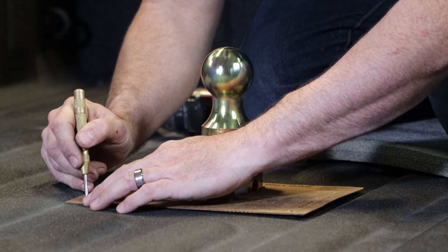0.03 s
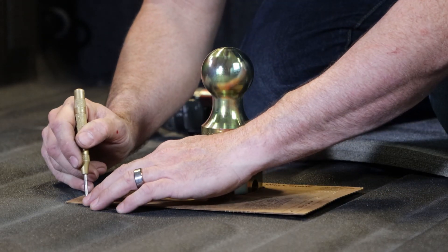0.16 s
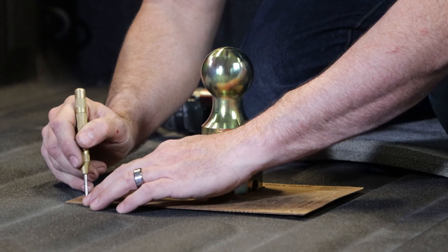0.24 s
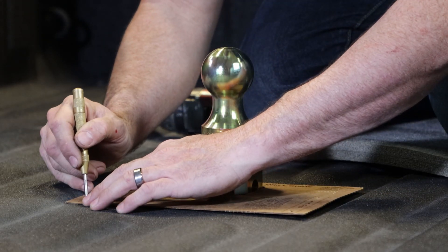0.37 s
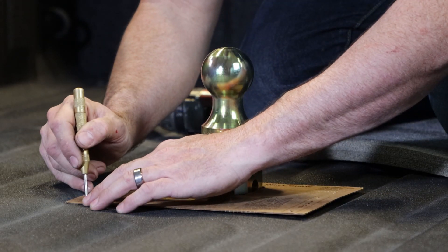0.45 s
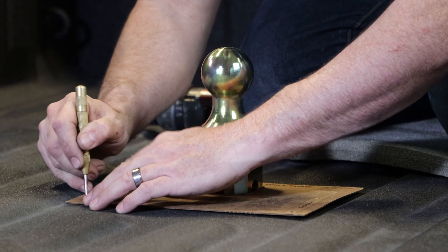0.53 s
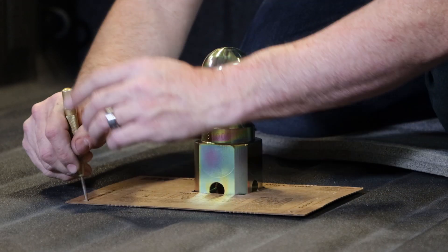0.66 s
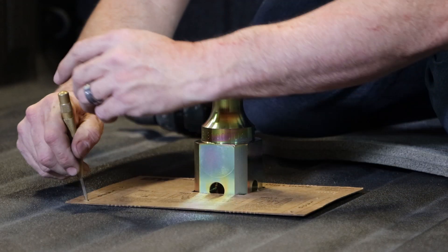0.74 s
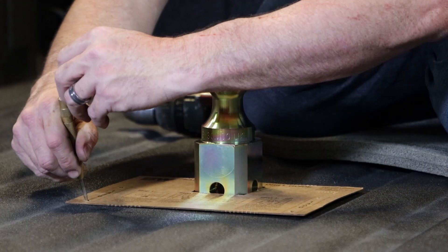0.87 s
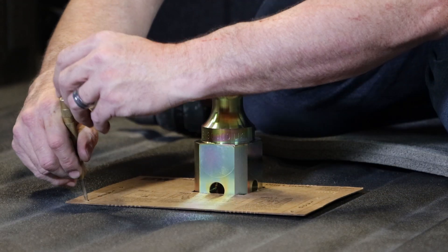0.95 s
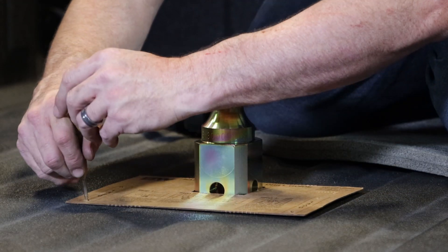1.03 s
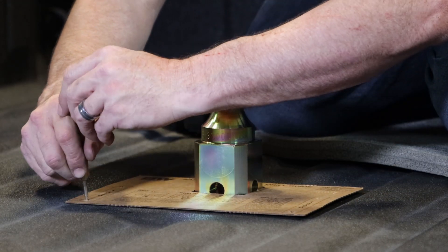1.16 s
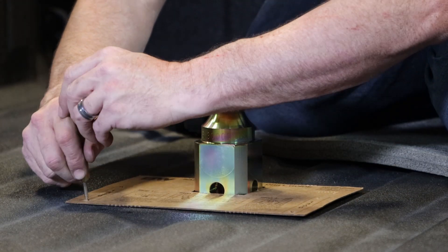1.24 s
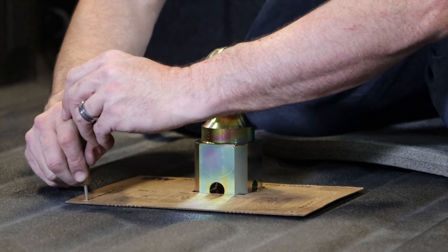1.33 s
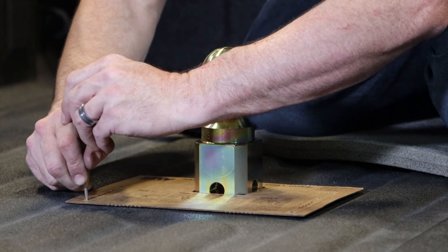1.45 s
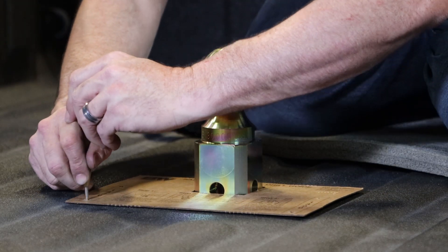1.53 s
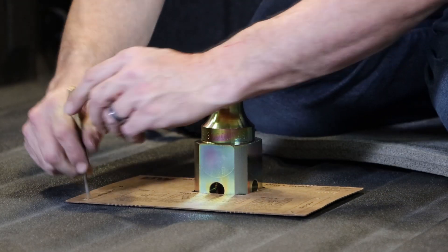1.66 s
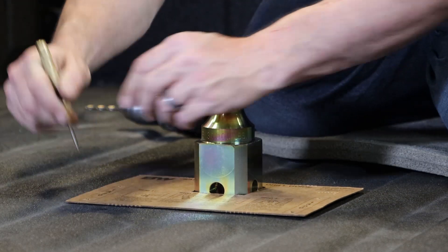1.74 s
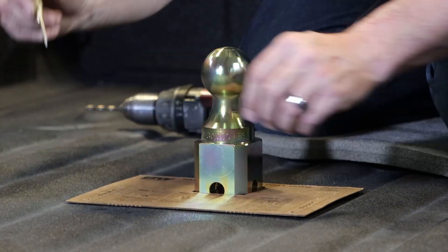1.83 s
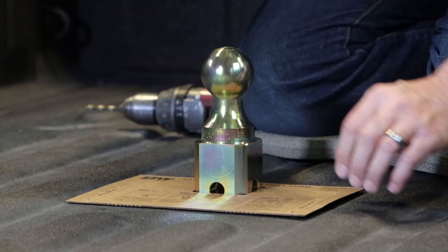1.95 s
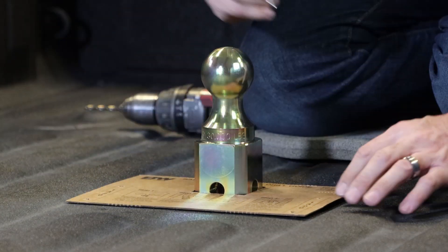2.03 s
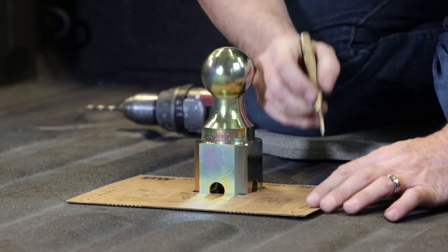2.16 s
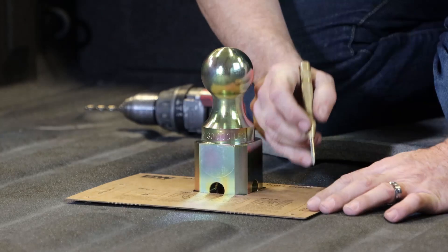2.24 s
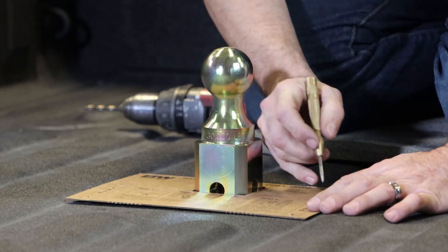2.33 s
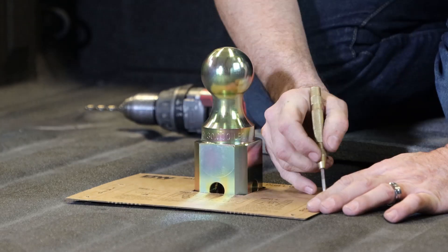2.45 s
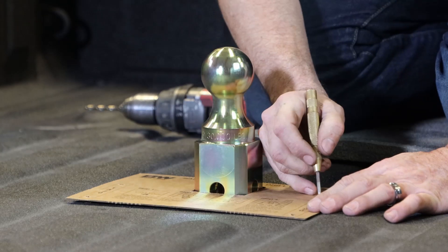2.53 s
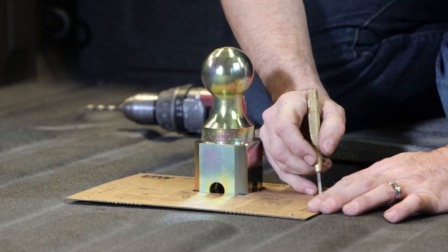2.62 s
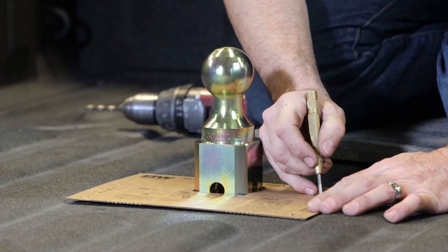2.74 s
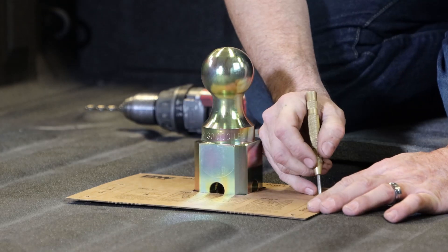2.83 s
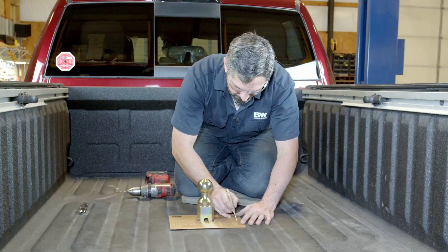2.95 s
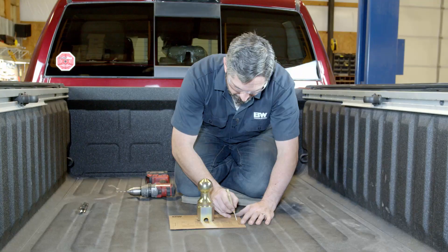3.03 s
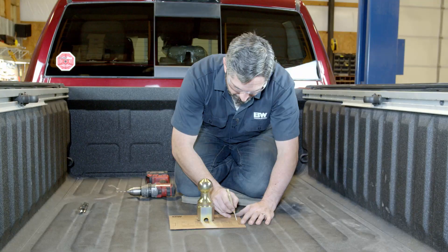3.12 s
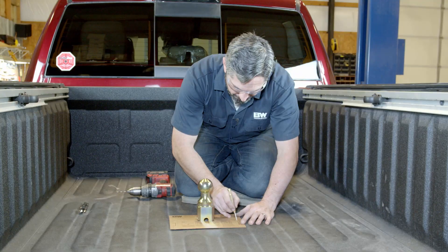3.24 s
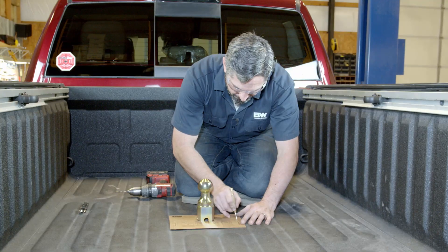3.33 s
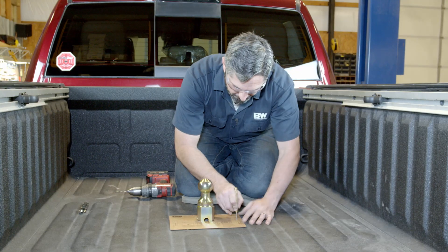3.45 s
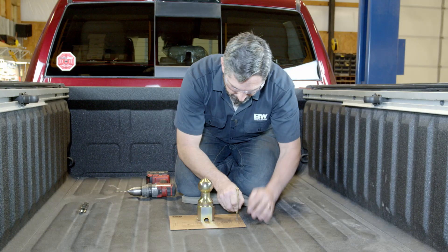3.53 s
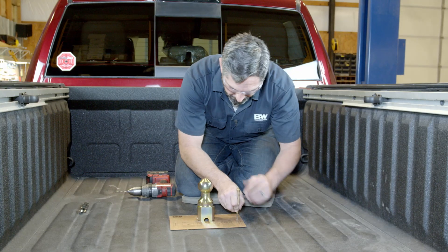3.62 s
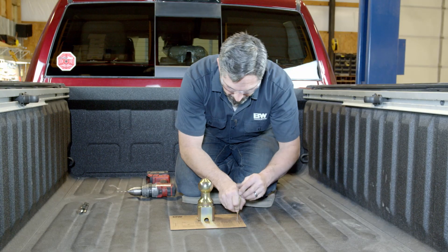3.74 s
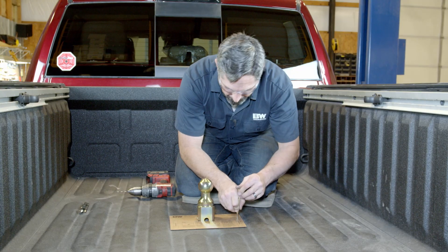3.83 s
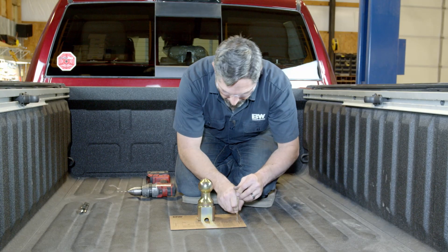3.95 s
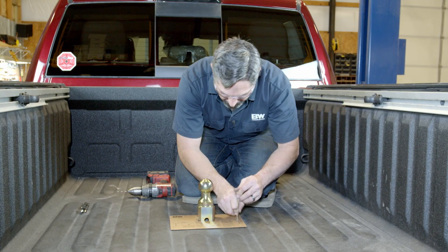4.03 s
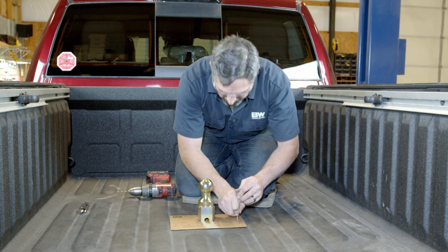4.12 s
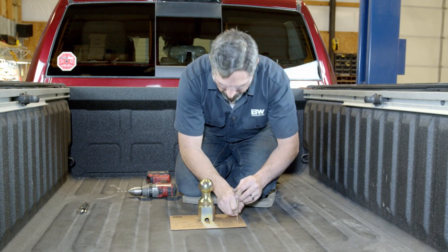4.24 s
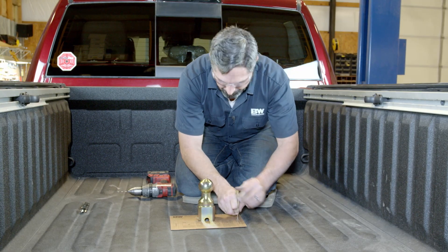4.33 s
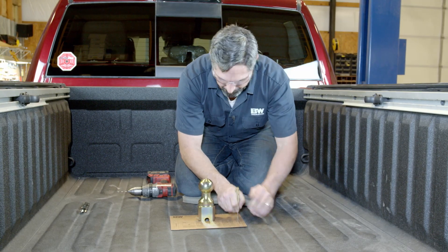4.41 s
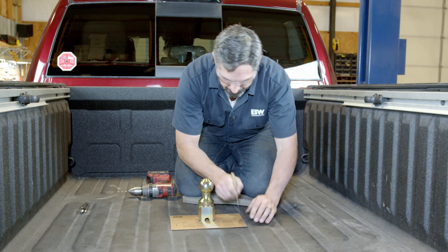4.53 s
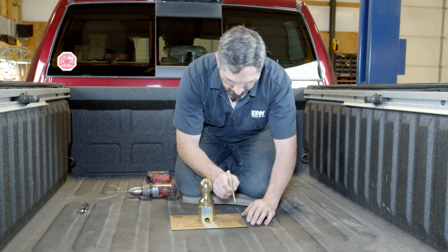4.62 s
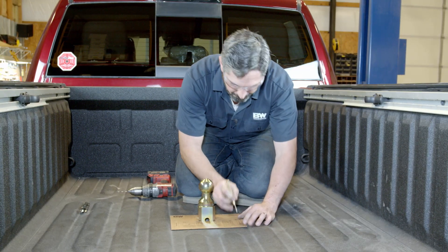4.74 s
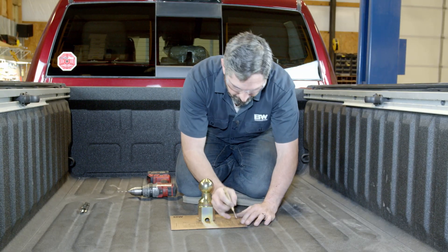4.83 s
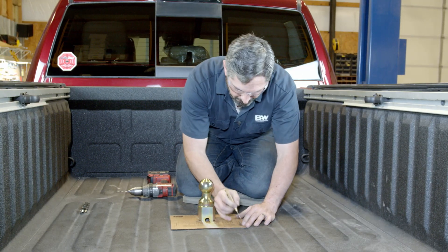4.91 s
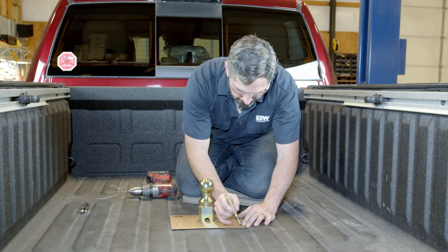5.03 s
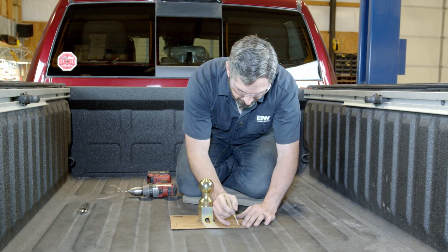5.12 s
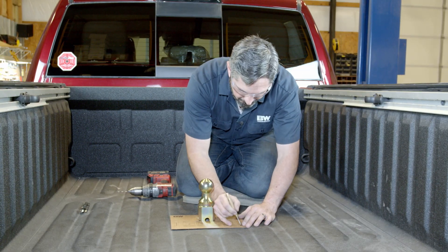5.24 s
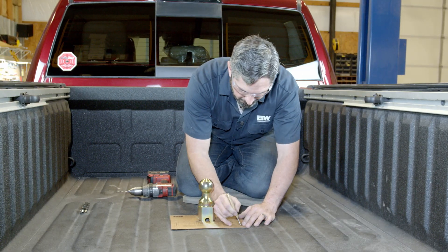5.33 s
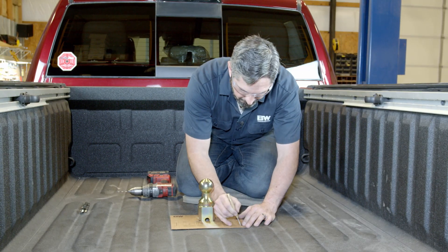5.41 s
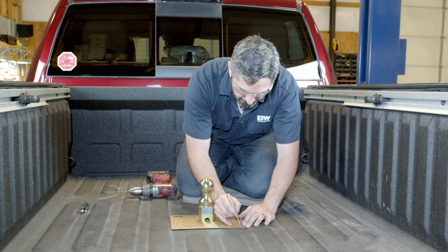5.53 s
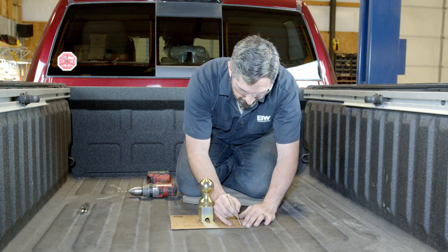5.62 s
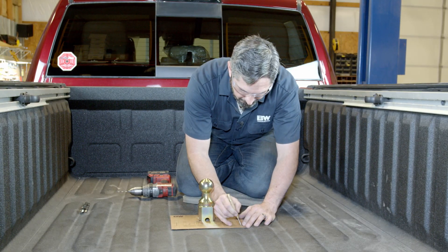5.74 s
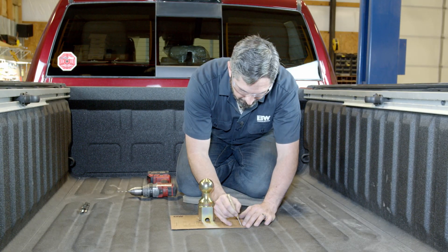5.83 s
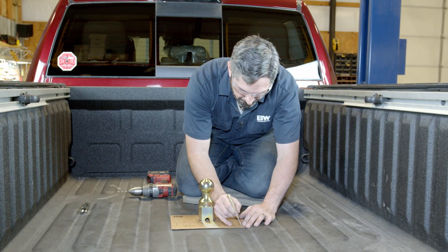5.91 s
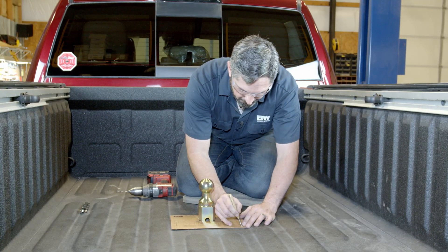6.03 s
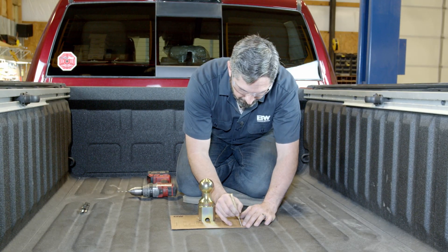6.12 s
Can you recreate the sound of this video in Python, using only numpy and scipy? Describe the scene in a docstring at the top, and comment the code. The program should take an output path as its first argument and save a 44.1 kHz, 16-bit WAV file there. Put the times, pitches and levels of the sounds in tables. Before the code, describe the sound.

A spring-loaded centre punch snaps twice, nearly three seconds apart, against a steel truck bed, sharp enough to overload the microphone for an instant. Each crack is preceded by gentle taps and a faint grinding push, and followed by dull knocks and a small click as the tool lifts. The floor rings briefly in a lightly echoing workshop. Tiny scrapes and ticks trail off over very quiet fan air.

```python
"""Centre punch on a truck bed

A spring-loaded centre punch marks two holes in the steel floor of a pickup bed, in a workshop.
Each time the tip is set down, the floor creaks under the push and the hammer trips with a crack that
overloads the microphone. The floor knocks back as the punch lifts, and the slide clicks home."""
import sys
import numpy as np
from scipy import signal
from scipy.fft import rfft, irfft
from scipy.io import wavfile

SR = 44100
rng = np.random.default_rng(int(sys.argv[2]) if len(sys.argv) > 2 else 0)


def output_pcm(signal):
    """Save a mono or channel-first signal as 16-bit PCM at the path in sys.argv[1].

    Samples are clipped to [-1, 1] before scaling.
    """
    pcm = np.clip(np.atleast_2d(signal).T, -1, 1) * 32767
    wavfile.write(sys.argv[1], SR, np.round(pcm).astype(np.int16))


N = 272097

# Each trip of the hammer and the push that leads up to it: start_s, crack_db, tilt_db_per_octave,
# ring_db, shove_db, ping_hz, ping_db, heave_db, push_length_s, creak_end_db
SHOTS = [(1.4559, -2.5, 0, -1, -1, 5542, -6.5, -27, .235, -45.5),
         (4.1212, -1.5, -2, -1.83, -3, 4568, -7.5, -7.5, .195, -38.5)]
# Hammer on the steel pin: band_hz, level_db, t60_s
CRACK_BANDS = [(1270, -10, 0.03), (2820, -5, 0.038), (6000, -7, 0.045), (7000, -15.5, 0.015),
               (12600, -14, 0.057), (15000, -20.5, .04)]
# The floor's modes at the first mark and, from MOVE_S on, at the second: pitch_hz, level_db, t60_s
FIRST_MARK_MODES = [(80, -16.5, 0.21), (127.96, -16.5, 0.16), (250, -18.5, 0.099), (289, -8, 0.15),
                    (352.4, -4.5, 0.11), (495.6, -0.78, 0.11), (523, -8, 0.12), (565, -26, 0.41),
                    (590, -7, 0.13), (658, -15, 0.1), (714, -18.5, 0.23), (870, -23.5, 0.18),
                    (941, -13.5, 0.11), (1047, -10.5, 0.14), (1128.4, -12, .1), (1290, -14, .1),
                    (1406, -12, .11), (1810, -17, 0.19), (2023, -19.5, .12), (2232.7, -22, 0.12)]
SECOND_MARK_MODES = [(157.3, -16, 0.34), (263.6, -9.5, 0.18), (359.1, -4, 0.2), (424, -7.5, .16),
                     (489, -7, 0.13), (561.7, -7.5, .15), (678, -12.5, .18), (707, -12, 0.16),
                     (905, -28.5, 0.25), (1073, -11, 0.1), (1184, -27, .22), (1390, -23.5, 0.23),
                     (1480, -27.5, 0.096), (1617, -23, 0.13), (1949, -26, 0.16), (2236, -18, 0.14),
                     (2466, -18.5, .09), (2907, -18, 0.11)]
MOVE_S = 2.1
# Dense ring of the ribbed floor between its modes: band_hz, level_db, t60_s
SHEET_BANDS = [(107, -25, 0.42), (250, -12.5, 0.15), (497, -15, 0.27), (1036, -12.5, 0.16),
               (1750, -14, 0.13), (3070, -17.5, 0.11), (5370, -22, 0.12)]
# Hands and tip landing, the floor giving or springing back: start_s, level_db, relative_clack_db
KNOCKS = [(0.5426, -43, -26), (0.654, -31.5, -10), (.888, -46, -48), (1.089, -39, -11), (1.224, -39.5, -26),
          (1.385, -41, -18.5), (1.692, -17, -15), (1.7019, -14, -23.5), (3.654, -44.5, -29.5),
          (3.6716, -31, -12.5), (3.929, -46.5, -15.5), (4.048, -42.5, -9.5), (4.3369, -15.5, -17),
          (4.458, -21.5, -14)]
# Colour of the tip grinding on the floor: frequency_hz, density_db
CREAK_COLOUR = [(25, -6.5), (120, -1), (200, -4), (290, 9), (480, -3), (750, -10), (1400, -26.5),
                (2500, -40), (6000, -49.5), (15000, -62.5)]
# Slide and spring snapping into place: start_s, level_db
CLICKS = [(0.556, -66.5), (0.655, -62), (1.695, -49), (1.702, -38), (2.422, -64), (3.039, -65),
          (4.371, -50.5), (4.451, -45.5), (5.82, -70)]
# Ring of those small parts: band_hz, level_db, t60_s
SLIDE_BANDS = [(1470, -24, 0.052), (4520, 1, 0.026), (7240, -6, 0.018), (9700, -10, 0.028),
               (14400, -9, .03)]
# Light ticks as the tip feels for its mark: start_s, end_s, level_db
FUMBLES = [(5.04, 5.199, -71)]
# The punch dragging on the floor or sliding in its sleeve: start_s, length_s, hiss_db, floor_db
SCRAPES = [(0.562, 0.064, -61.5, -78), (1.725, .03, -50, -32.5), (1.752, 0.024, -44, -41),
           (2.282, 0.051, -56.5, -58.5), (4.398, 0.015, -55.5, -38.5), (4.494, 0.038, -48.5, -62),
           (4.772, 0.056, -58.5, -63), (4.956, 0.054, -59, -58)]
# Workshop reverb: band_hz, gain_db, t60_s
ECHO_BANDS = [(60, -16.5, 0.66), (160, -16, 0.93), (388, -23.5, 0.3), (1000, -24, 0.74), (2540, -19, .6),
              (6300, -21, .55), (7700, -21.5, 0.72), (14000, -21, 0.23)]
# Colour of the moving air: frequency_hz, density_db
AIR_COLOUR = [(20, -2.5), (40, -1), (65, -1.5), (110, -2.5), (165, -7), (245, -6), (400, -12), (490, -11.5),
              (700, -15), (1050, -18.5), (1650, -23), (3000, -28.5), (6000, -36), (9000, -42), (15500, -45)]
# Faint hum of the shop's fans: pitch_hz, level_db
FAN_HUM = [(91.5, -78.5), (118.4, -80.5), (247.6, -80), (360.7, -84), (484.5, -82), (602.9, -85.5),
           (796.7, -88), (1082, -90.5)]


def punch_shots(shove_s=.0012, ping_s=0.0055, heave_hz=27, heave_s=.016, tilt_pivot_hz=4000):
    """The tip shoves the floor, the hammer cracks and pings on the pin, the floor rings and heaves."""
    out = np.zeros(N)
    octaves = np.log2(np.transpose(CRACK_BANDS)[0] / tilt_pivot_hz)
    for start_s, crack_db, tilt_db, ring_db, shove_db, ping_hz, ping_db, heave_db, _, _ in SHOTS:
        ring = floor_ring(start_s, modes_db=0.5, sheet_db=1.5, spread_s=0.0026)
        t = np.arange(len(ring)) / SR
        # the chattering pin gives a rough, narrow ping that the hand damps at once
        ping_colour = [(.7 * ping_hz, -40), (.92 * ping_hz, 0), (1.08 * ping_hz, 0), (1.4 * ping_hz, -40)]
        ping = coloured(rng.standard_normal(len(t)), ping_colour) * np.exp(-t / ping_s)
        shove = amp(shove_db) * np.sin(np.pi * np.minimum(t / shove_s, 1)) ** 2
        crack = amp(crack_db + tilt_db * octaves) @ dying_bands(CRACK_BANDS, size=8192)
        heave = amp(heave_db) * np.exp(-t / heave_s) * np.sin(2 * np.pi * heave_hz * t)
        add(out, start_s - shove_s, shove)
        add(out, start_s, crack)
        add(out, start_s, amp(ping_db) * ping + amp(ring_db) * ring + heave)
    return out


def floor_ring(start_s, modes_db, sheet_db, spread_s=0.0019):
    """The steel floor rings at the mark in use; the attack softens as bending waves take time to spread."""
    sheet = dying_bands(SHEET_BANDS, size=32768).sum(0)
    t = np.arange(len(sheet)) / SR
    mark = FIRST_MARK_MODES if start_s < MOVE_S else SECOND_MARK_MODES
    modes = sum((-1) ** k * amp(db) * np.exp(-np.log(1000) * t / t60) * np.sin(2 * np.pi * hz * t)
                for k, (hz, db, t60) in enumerate(mark))
    attack = 1 - np.exp(-t / spread_s)
    return (amp(modes_db) * modes + amp(sheet_db) * sheet) * attack


def floor_knocks(thud_db=-11, thud_hz=130, thud_s=.016):
    """Softer blows draw a duller ring from the floor, over a low thud; the hard tip adds a clack."""
    out = np.zeros(N)
    for start_s, level_db, clack_db in KNOCKS:
        # a harder clack means a stiffer, shorter contact: brighter body, faster attack
        hardness_db = clack_db + 15
        corner_hz = 335 * 2 ** (hardness_db / 45)
        touch_s = .0008 * 2 ** (-hardness_db / 11)
        ring = floor_ring(start_s, modes_db=-4, sheet_db=1.5, spread_s=touch_s)
        hard_ring = floor_ring(start_s, modes_db=-4.5, sheet_db=4.5, spread_s=touch_s)
        t = np.arange(len(ring)) / SR
        thud = amp(thud_db) * np.exp(-t / thud_s) * np.sin(2 * np.pi * thud_hz * t)
        body = dulled(ring + thud, corner_hz, q=1.3)
        clack = amp(clack_db) * dulled(hard_ring, hz=1500, q=.6)
        add(out, start_s, amp(level_db) * (body + clack))
    return out


def tip_creaks(grain=0.19, lurch_hz=30, lurch_db=2, push_start_db=-54.5, take_up_s=.006):
    """Under a growing push the tip grinds in tiny, lurching slips that sound through the floor."""
    slips = rng.standard_normal(N) * np.exp(grain * rng.standard_normal(N))
    lurches = coloured(rng.standard_normal(N), [(lurch_hz, 0), (2 * lurch_hz, -100)])
    push = np.zeros(N)
    for shot_s, *_, push_s, creak_end_db in SHOTS:
        t = np.arange(0, push_s, 1 / SR)
        swell = amp(np.linspace(push_start_db, creak_end_db, len(t)))
        add(push, shot_s - push_s, swell * (1 - np.exp(-t / take_up_s)))
    return push * coloured(slips * amp(lurch_db * lurches), CREAK_COLOUR)


def steel_clicks(ticks_per_s=35, slip_s=0.0011):
    """Slide, spring and tip tick as a brief, rough slip rings the small steel parts."""
    out = np.zeros(N)
    ticks = [(tick_s, level_db) for start_s, end_s, level_db in FUMBLES
             for tick_s in rng.uniform(start_s, end_s, round(ticks_per_s * (end_s - start_s)))]
    t = np.arange(0, 4 * slip_s, 1 / SR)
    for start_s, level_db in CLICKS + ticks:
        ring = dying_bands(SLIDE_BANDS, size=4096).sum(0)
        slip = rng.standard_normal(len(t)) * np.exp(-t / slip_s)
        add(out, start_s, amp(level_db) * signal.fftconvolve(ring, slip / np.linalg.norm(slip)))
    return out


def punch_scrapes(grain_db=7):
    """A short drag swells and fades; its gritty friction rings both the punch and the floor."""
    out = np.zeros(N)
    for start_s, length_s, hiss_db, floor_db in SCRAPES:
        t = np.arange(0, length_s, 1 / SR)
        slips, sizes = rng.standard_normal((len(t), 2)).T
        friction = slips * amp(grain_db * sizes) * np.sin(np.pi * t / length_s)
        punch = amp(hiss_db) * dying_bands(SLIDE_BANDS, size=32768).sum(0)
        ring = floor_ring(start_s, modes_db=-0.5, sheet_db=3.5)
        floor = amp(floor_db) * dulled(ring, hz=1100, q=1.82)
        add(out, start_s, signal.fftconvolve(punch + floor, friction / np.linalg.norm(friction)))
    return out


def workshop_echo(x, build_s=0.027, low_cut_hz=58):
    """A diffuse tail blooms as the sound reaches the walls; the deepest bass does not come back."""
    hz, db, _ = np.transpose(ECHO_BANDS)
    bands = dying_bands(ECHO_BANDS, size=65536)
    t = np.arange(bands.shape[1]) / SR
    bands *= 1 - np.exp(-t / build_s)
    spectrum_share = abs(np.gradient(hz)) / (SR / 2)
    tail = (amp(db) * np.sqrt(spectrum_share) / np.linalg.norm(bands, axis=1)) @ bands
    low_cut = signal.butter(6, low_cut_hz, "high", fs=SR, output="sos")
    return signal.fftconvolve(x, signal.sosfilt(low_cut, tail))[:N]


def ventilation(air_db=-65, waver_hz=7):
    """A bed of moving air with a faint, wavering fan hum."""
    f = np.fft.rfftfreq(N, 1 / SR)
    noise = rfft(rng.standard_normal(N))
    hum = sum(amp(db) * unit_rms(irfft(noise / (1 + ((f - hz) / waver_hz) ** 2), N))
              for hz, db in FAN_HUM)
    return hum + amp(air_db) * coloured(rng.standard_normal(N), AIR_COLOUR)


def dying_bands(bands, size):
    """Noise split into bands of (band_hz, level_db, t60_s), each with its own decay; one row a band."""
    hz, db, t60 = np.transpose(bands)
    f, t = np.fft.rfftfreq(size, 1 / SR), np.arange(size) / SR
    shares = np.array([np.interp(np.log(f + 1), np.log(hz), row) for row in np.eye(len(hz))])
    # roll off beyond the outer bands
    shares *= f ** 4 / (f ** 4 + (hz[0] / 2) ** 4) / (1 + (f / hz[-1] / 1.3) ** 12)
    noise = irfft(np.sqrt(shares) * np.exp(2j * np.pi * rng.random(shares.shape)), size)
    fade = np.exp(-np.log(1000) * t / t60[:, None])
    rows = noise * fade
    gains = amp(db) * np.linalg.norm(fade, axis=1) / np.linalg.norm(rows, axis=1)
    return rows * gains[:, None]


def dulled(x, hz, q):
    """A springy contact acts as a resonant low-pass: little gets through above its own frequency."""
    w = 2 * np.pi * hz
    return signal.lfilter(*signal.bilinear([w ** 2], [1, w / q, w ** 2], SR), x)


def coloured(x, points):
    """Shapes x with an EQ curve of (frequency_hz, gain_db) points, at rms 1."""
    hz, db = np.transpose(points)
    f = np.fft.rfftfreq(len(x), 1 / SR)
    curve = amp(np.interp(np.log(f + 1), np.log(hz), db))
    return unit_rms(irfft(rfft(x) * curve, len(x)))


def amp(db):
    """Decibels to gain."""
    return 10 ** (np.asarray(db) / 20)


def unit_rms(x):
    """Scales to rms 1."""
    return x / np.sqrt(np.mean(x ** 2) + 1e-20)


def add(mix, start_s, sound):
    """Mixes a sound in at start_s."""
    part = mix[round(start_s * SR):][:len(sound)]
    part += sound[:len(part)]


def scene(echo_layers=3):
    """The work on the truck bed, its echo and the quiet air of the shop, in mono."""
    handling = floor_knocks() + punch_scrapes() + steel_clicks() + tip_creaks()
    # the floor radiates a different mix towards each wall, so the echo of a shot is an even wash
    echo = sum(workshop_echo(punch_shots() + handling) for _ in range(echo_layers))
    return (punch_shots() + handling + echo / np.sqrt(echo_layers) + ventilation())[None]


def record(dry, low_cut_hz=14, high_cut_hz=15850):
    """The microphone drops the slowest pressure swings and overloads on the shots; a high cut follows."""
    low_cut = signal.butter(1, low_cut_hz, "high", fs=SR)
    overloaded = np.clip(signal.lfilter(*low_cut, dry), -1, 1)
    high_cut = signal.firwin(511, high_cut_hz, window=("kaiser", 9), fs=SR)
    return signal.oaconvolve(overloaded, high_cut[None], "same")


dry = scene()
out = record(dry)
output_pcm(out)
```